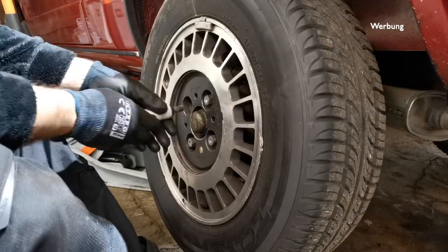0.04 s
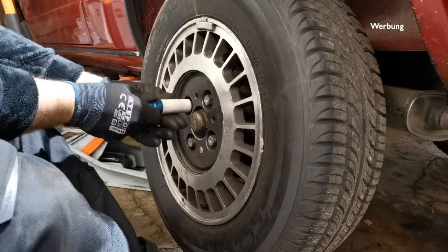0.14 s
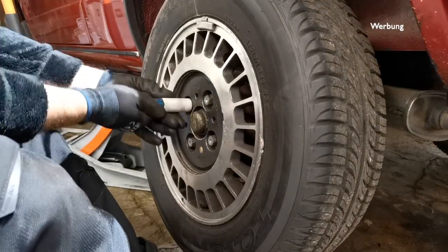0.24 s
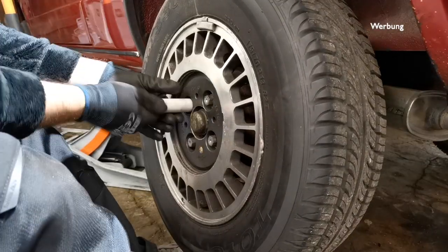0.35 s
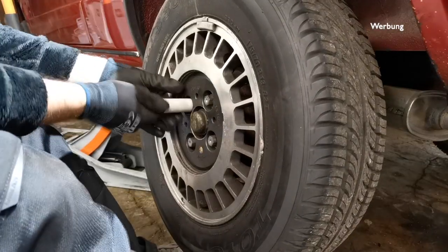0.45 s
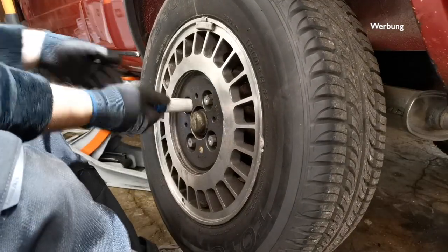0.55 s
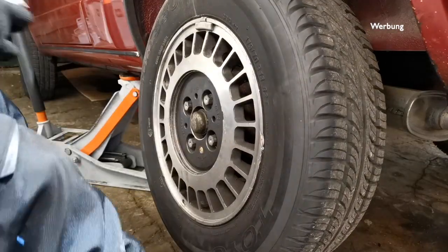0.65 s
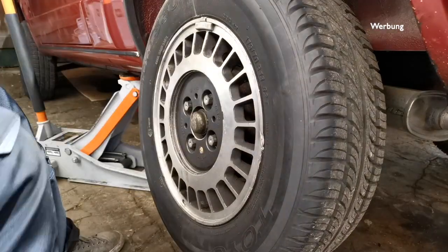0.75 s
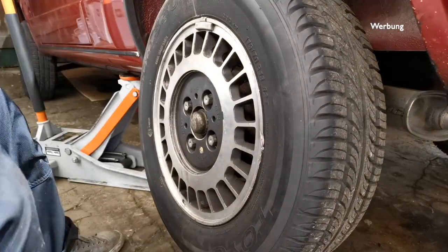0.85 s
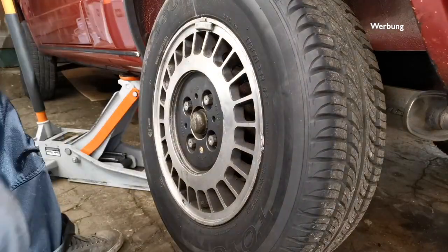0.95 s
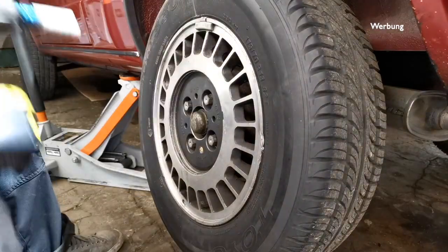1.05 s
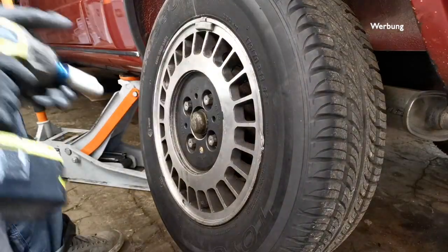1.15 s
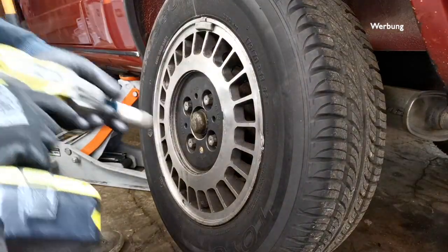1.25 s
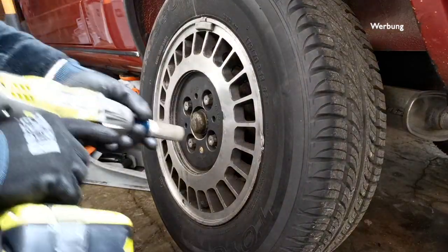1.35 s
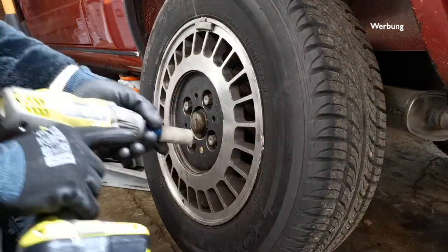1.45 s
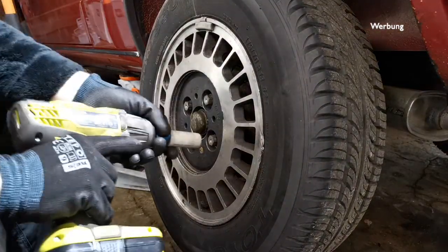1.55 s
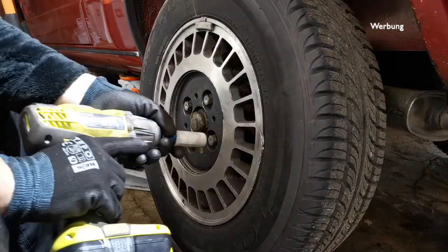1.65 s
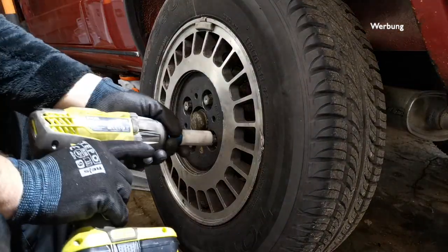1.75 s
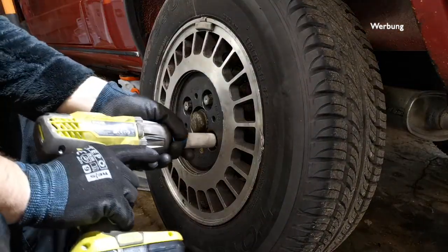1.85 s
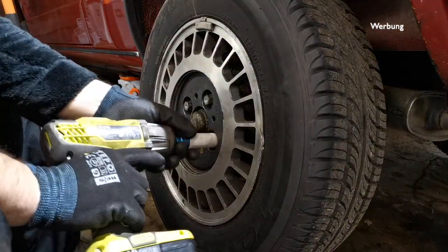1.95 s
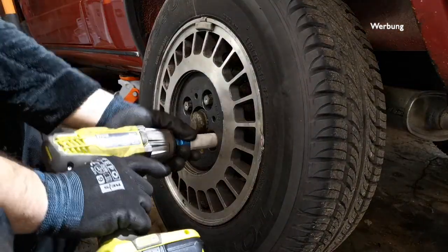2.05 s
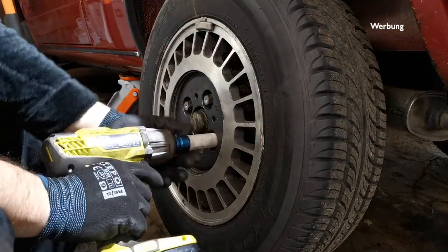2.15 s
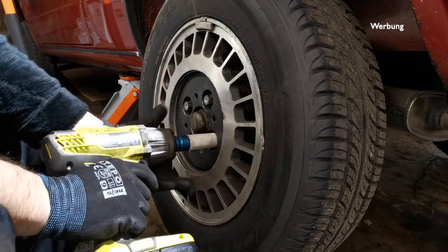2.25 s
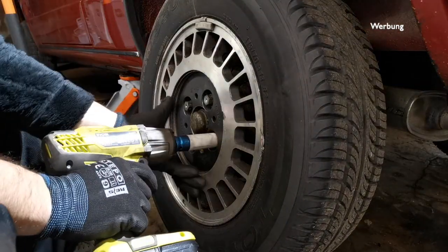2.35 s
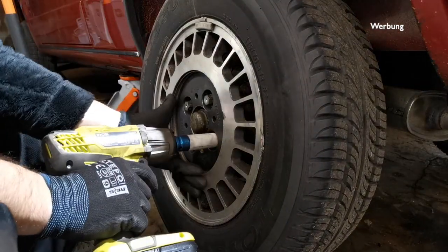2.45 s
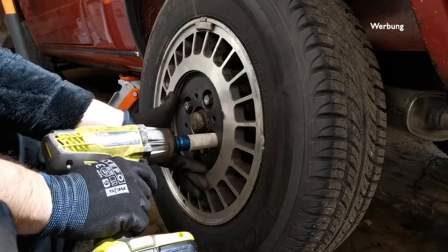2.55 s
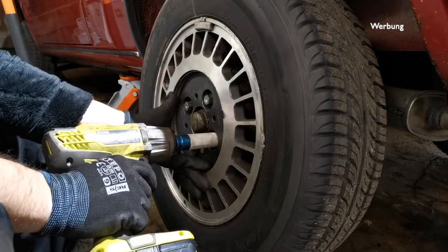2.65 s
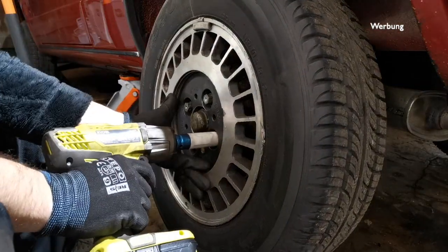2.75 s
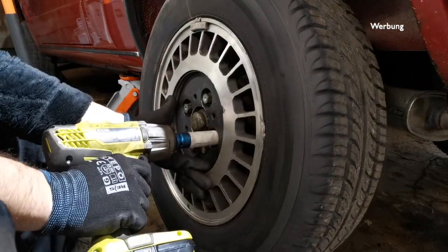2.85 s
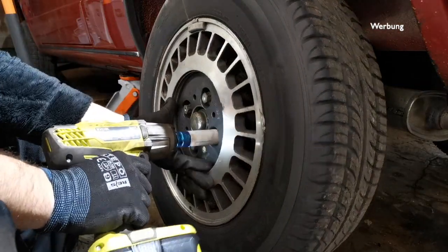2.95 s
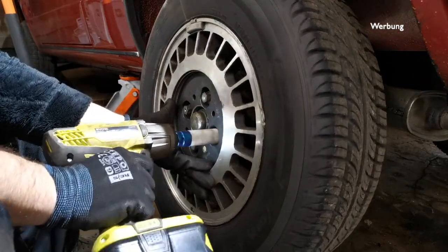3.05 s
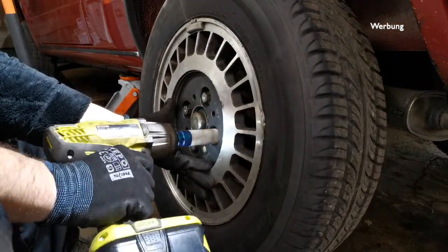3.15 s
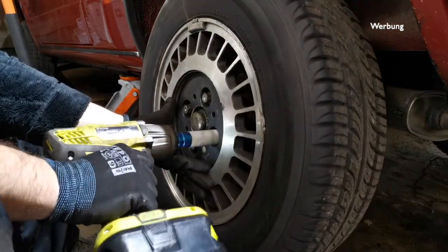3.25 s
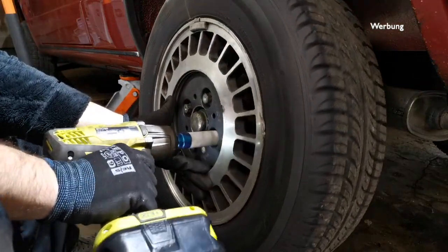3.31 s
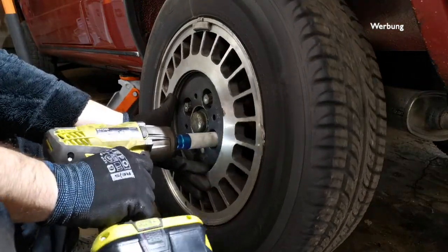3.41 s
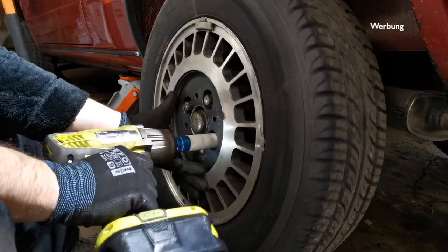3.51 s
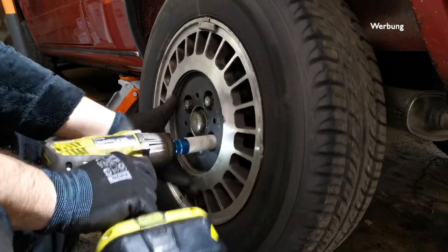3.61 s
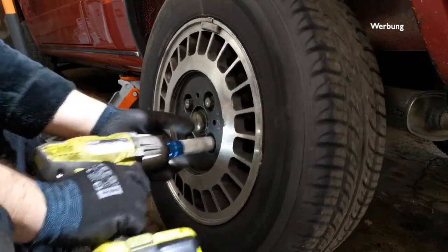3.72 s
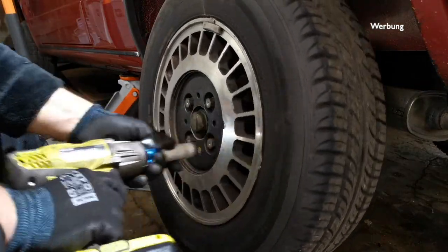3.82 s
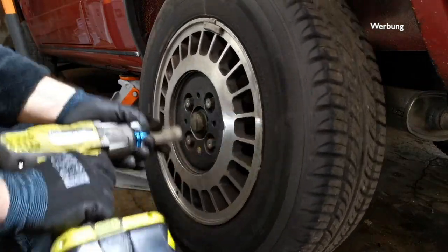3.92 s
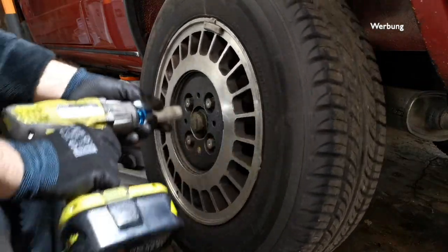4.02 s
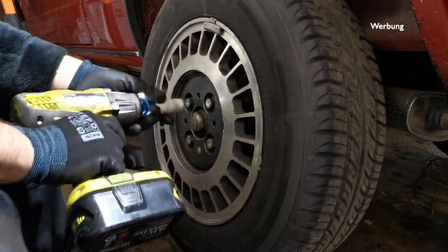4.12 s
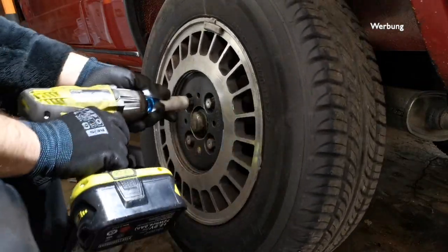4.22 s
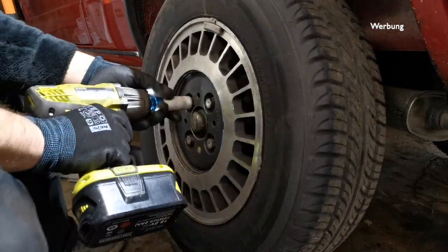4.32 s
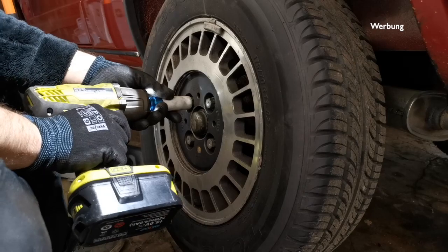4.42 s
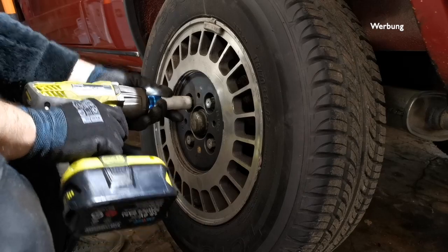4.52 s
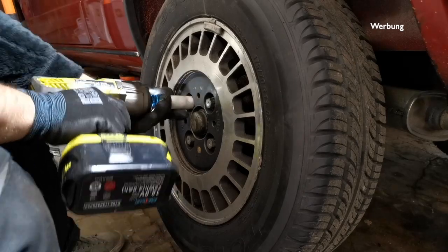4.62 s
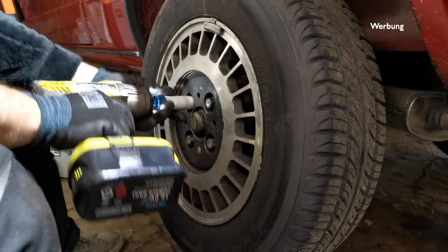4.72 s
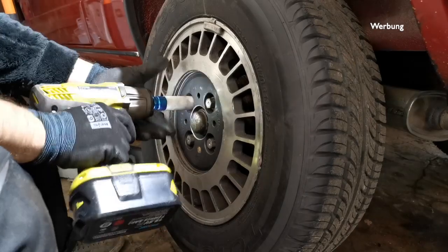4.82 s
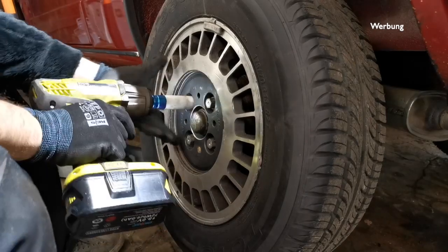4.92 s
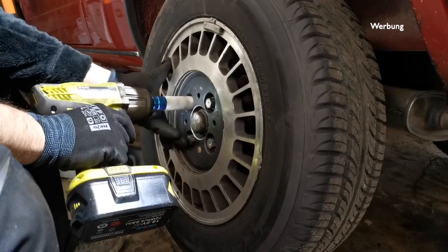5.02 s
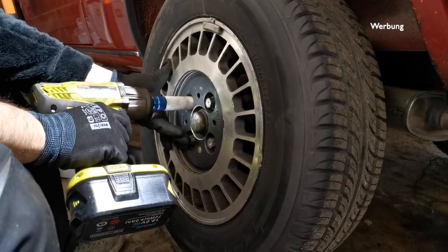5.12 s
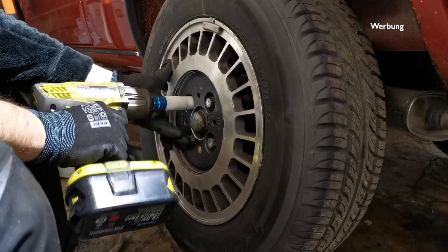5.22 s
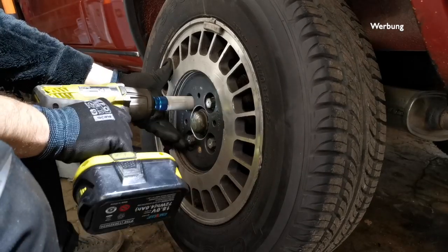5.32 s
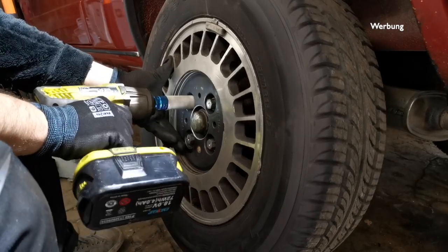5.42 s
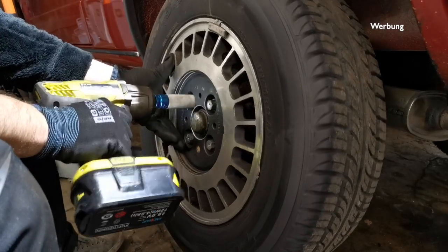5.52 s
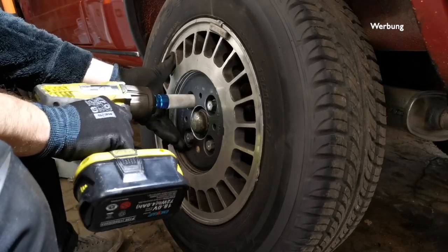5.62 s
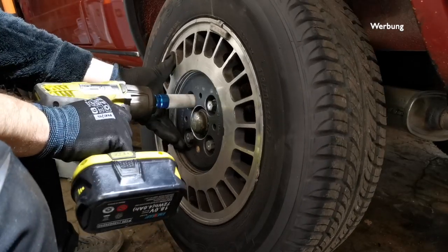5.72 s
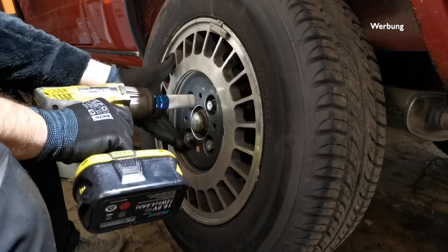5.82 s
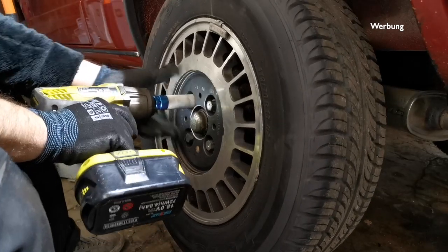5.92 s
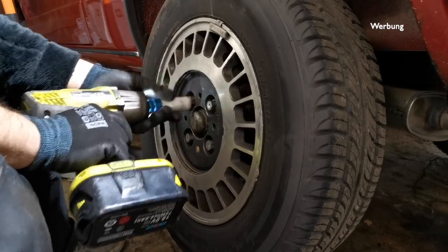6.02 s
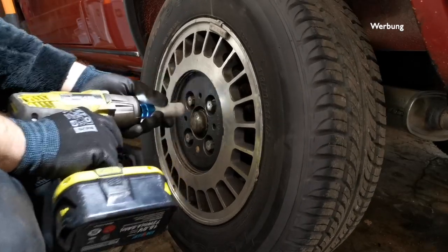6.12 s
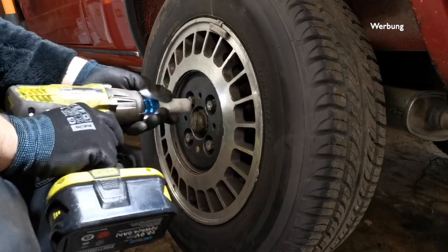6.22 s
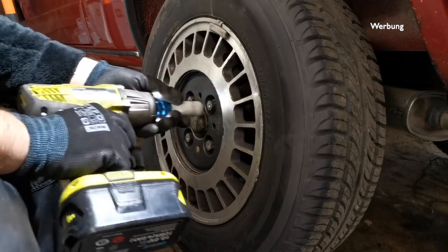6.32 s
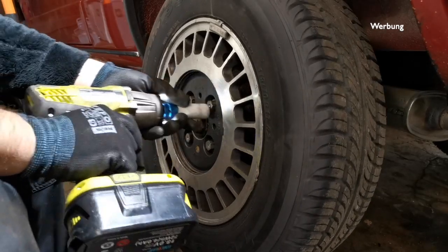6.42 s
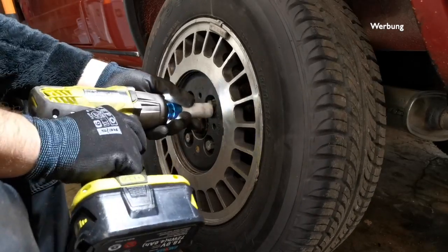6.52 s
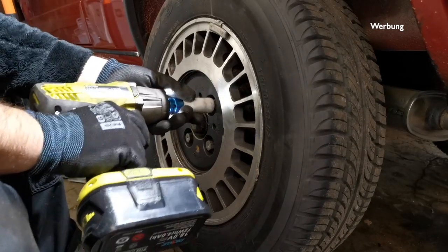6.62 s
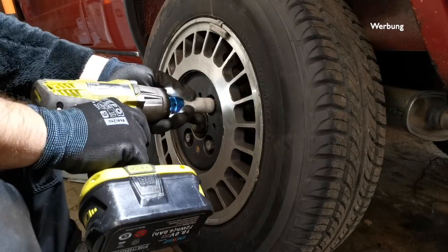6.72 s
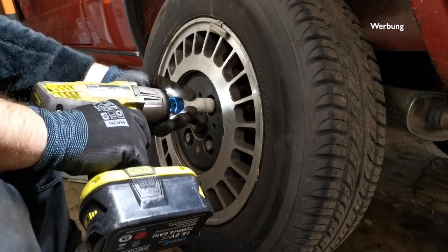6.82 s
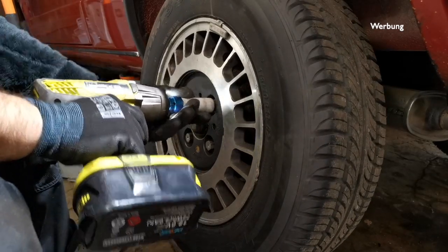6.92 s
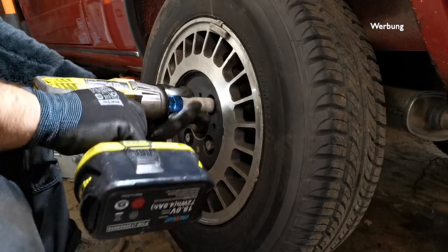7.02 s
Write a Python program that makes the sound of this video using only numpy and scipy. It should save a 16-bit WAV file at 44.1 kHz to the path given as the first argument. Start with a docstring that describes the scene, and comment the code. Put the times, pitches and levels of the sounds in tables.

```python
"""Impact wrench in a garage

A bolt is started by hand; then a cordless wrench tightens two wheel bolts. Its motor spins up, and
the hammer strikes the anvil about 41 times a second, stumbling between runs. Each impact excites
bolt, wheel and socket, reverberates between hard walls and overloads the microphone."""
import sys
import numpy as np
from scipy import signal
from scipy.fft import rfft, irfft
from scipy.io import wavfile
from scipy.ndimage import map_coordinates

SR = 44100
rng = np.random.default_rng(int(sys.argv[2]) if len(sys.argv) > 2 else 0)


def int16_out(signal):
    """Quantize to a 16-bit WAV file."""
    q = np.round(np.clip(np.atleast_2d(signal).T, -1, 1) * 32767)
    wavfile.write(sys.argv[1], SR, q.astype(np.int16))


N = 311346

# Levels are relative; spectra give level per unit bandwidth; t60 is the time to decay by 60 dB.
# reverberation time of the garage: f/Hz, t60/s
ROOM_T60 = [(100, 0.92), (400, 0.4768), (1000, 0.5943), (2800, 0.5531), (5500, 0.5462), (8000, 0.45),
            (11000, 0.36), (15000, 0.26)]
# initial spectrum of the reverberation: f/Hz, level/dB
ROOM_SPECTRUM = [(100, -6.5), (500, 4.5), (2000, -0.5), (6000, -0.5), (9000, -2), (15000, -2)]
# faint opening hiss: f/Hz, level/dB
HISS_SPECTRUM = [(40, -15), (100, -14.5), (160, -6), (230, -8.5), (330, 0.5), (390, -8), (470, 1),
                 (620, -10.5), (950, -4), (1400, -14.5), (3500, -17), (7000, -7), (13000, -7), (15500, -10)]
# hum and air of the workshop: f/Hz, level/dB
SHOP_SPECTRUM = [(15, -25), (25, 3), (82, -7.5), (113, 2.5), (152, -7), (340, -7.5), (410, -5), (457, -6.5),
                 (1620, -6.5), (8810, -24), (10600, -27.5), (12800, -22.5), (15500, -29)]
# rubbing cloth: f/Hz, level/dB
CLOTH_SPECTRUM = [(120, -37), (200, -4), (321, -4.5), (479, -8.5), (1110, -1), (4580, -5.5), (6590, -7),
                  (15500, -17.5)]
# sleeves and gloves brushing as the arms move: start t/s, end t/s, level/dB
ARM_MOVES = [(0, 1.0, -77.5), (1.01, 1.45, -65), (2.197, 2.598, -69), (4.5, 4.85, -72)]
# fingers and bolt clicking in its hole: t/s, level/dB, centre f/Hz, width/octaves
BOLT_TICKS = [(.047, -63, 12100, .2), (.148, -61, 13000, .5), (.646, -59, 2300, 1.1), (.657, -58, 9000, 1),
              (.708, -53, 3420, 1.2), (.793, -64, 2500, 1), (.826, -52, 12400, .7), (.9, -54.5, 4240, 1.2),
              (.9325, -44, 5260, 2.2), (1.063, -51, 6500, .6), (1.135, -52, 6500, .7)]
# socket and tool knocking on wheel and bolt heads: t/s, level/dB, centre f/Hz, width/octaves
TOOL_KNOCKS = [(1.526, -37, 3570, 2.2), (1.856, -44, 1580, 1.2), (1.96, -50.5, 700, 2.2),
               (2.481, -52, 4000, 3.6), (2.885, -53, 6030, .95), (4.297, -42, 1480, .9),
               (4.313, -39.5, 2800, 2.2), (4.321, -35.5, 930, 1.27), (4.507, -57, 8100, .5),
               (4.58, -56, 709, 1.5), (4.765, -56, 4000, 2.6), (4.795, -51.5, 8000, .8),
               (4.95, -53, 550, 1.06), (5.174, -50.5, 5990, .95), (6.465, -61.5, 400, 0.52),
               (6.627, -48.5, 1290, .8), (6.6505, -45, 1290, 0.86)]
# resonances of the wheel and the loose socket: f/Hz, bandwidth/Hz, level/dB
WHEEL_RESONANCES = [(480, 160, 1.5), (1016, 250, 4.5), (1350, 200, 3.5), (1760, 200, 1), (2530, 370, 4),
                    (2870, 300, 3), (3560, 300, 4.5), (5900, 280, 0)]
# weak treble of a light touch: f/Hz, level/dB
TOUCH_ROLLOFF = [(8500, -3), (10500, -12), (14000, -6.5)]
# gear noise: f/Hz, level/dB
GEAR_SPECTRUM = [(59, -61), (100, -23), (386, -28), (727, -13), (1260, -11), (1960, -14.5), (2220, -0.5),
                 (2690, 2.5), (3460, -4.5), (4100, -11.5), (8580, -15), (10800, -26.5), (13100, -17),
                 (15500, -29)]
# gear whine: harmonic number, level/dB
MESH_HARMONICS = [(1, -16), (2, -6), (3, -2), (4, -18)]
# trigger pulls, one per bolt: pressed t/s, bolt seated t/s, released t/s, spin-up time constant/s,
# gear noise level/dB, rise under load/dB
TRIGGER_PULLS = [(2.941, 3.029, 3.63, .024, 4, 2), (5.232, 5.322, 5.89, .012, 1.5, 6.5)]
# radiation of the first bolt and the wheel: f/Hz, level/dB
FIRST_BOLT_SPECTRUM = [(18, -50), (30, -19), (77, -25.5), (111, -21), (324, -24), (532, -17.5),
                       (591, -21.5), (709, -16), (1200, -13.5), (2300, -6.5), (4420, -5.5), (6210, -1.5),
                       (8280, -1.5), (9680, -11.5), (15500, -16)]
# radiation of the second bolt and the wheel: f/Hz, level/dB
SECOND_BOLT_SPECTRUM = [(18, -49), (30, -19), (192, -18.5), (237, -17.5), (350, -24), (479, -12.5),
                        (606, -17.5), (673, -13.5), (1720, -5.5), (2690, -0.5), (5170, -1), (7080, -2),
                        (8500, 0.5), (10200, -9.5), (15500, -10.5)]
# modes of socket and anvil: f/Hz, level on the first bolt/dB, level on the second/dB, t60/s
SOCKET_MODES = [(2770, -17.5, -18, 0.065), (3750, -21, -18, 0.0088), (4900, -20.5, -2.5, 0.022),
                (5247, -3, -3, 0.038), (5550, -6.5, -12, 0.075), (5790, -10, -10.5, 0.086),
                (6374, -2.5, -9, 0.057), (7280, -7, -12.5, .025), (8120, -11, -18.5, .02),
                (8430, -8.5, -6, 0.04), (8840, -18.5, -10, 0.024)]
# steady hammering: first blow t/s, number of blows, rate/Hz, lag of the second blow/s, level/dB,
# first ring level/dB, last ring level/dB
HAMMER_RUNS = [(3.2374, 6, 43, 0.0041, 0.9, 4, 1.5), (3.4845, 6, 41.3, 0.0041, 2.5, 0, 4.5),
               (5.3312, 7, 41.67, .0003, -.5, -6, 2), (5.5989, 11, 40.8, 0.0044, -0.1, -7.5, 4.5)]
# single blows as the hammer catches, stumbles or runs out: t/s, level/dB, ring level/dB
SINGLE_BLOWS = [(2.976, -20, -7), (3.0315, -13, -10), (3.0392, -1.5, -6.5), (3.0782, -2, -5),
                (3.1348, -4, -2.5), (3.152, -5.5, -4), (3.4474, -2.5, 1.5), (3.4584, -3, -1),
                (5.3245, -14.5, -5), (5.5023, -3.5, -5.5), (5.8785, -4, 9)]


def amp(db):
    """Amplitude ratio of a level in decibels."""
    return 10 ** (np.asarray(db) / 20)


def along(points, hz):
    """Interpolation of (f/Hz, value) points on a logarithmic frequency axis."""
    f, values = np.transpose(points)
    return np.interp(np.log(hz + 1), np.log(f + 1), values)


def wobble(rate):
    """Random modulation: a spline through `rate` Gaussian values a second."""
    return map_coordinates(rng.standard_normal(N // 50), [np.arange(N) * rate / SR], mode="wrap")


def noise(spectrum, size):
    """Spectral shaping: white noise filtered by (f/Hz, level/dB) points and scaled to rms 1."""
    gain = amp(along(spectrum, np.fft.rfftfreq(size, 1 / SR)))
    shaped = irfft(rfft(rng.standard_normal(size)) * gain, size)
    return shaped / np.sqrt(np.mean(shaped ** 2) + 1e-20)


def gate(on, off, rise_s, fall_s):
    """First-order response: exponential rise from time `on`, exponential decay from time `off`."""
    t = np.arange(N) / SR
    return (1 - np.exp(-np.maximum(t - on, 0) / rise_s)) * np.exp(-np.maximum(t - off, 0) / fall_s)


def add(track, s, sound):
    """Superposition of a sound on a track at s seconds."""
    start = max(round(s * SR), 0)
    track[start:start + len(sound)] += sound[:len(track) - start]


def diffuse_tail(spectrum, build_s=0.0035):
    """Reverberation of unit energy: the diffuse field builds up, then decays, the treble fastest."""
    hz, t, bins = signal.stft(noise(spectrum, SR * 3 // 4), SR, nperseg=256)
    decay = amp(along(ROOM_SPECTRUM, hz)[:, None] - 60 * t / along(ROOM_T60, hz)[:, None])
    tail = signal.istft(bins * decay * (1 - np.exp(-t / build_s)), SR, nperseg=256)[1]
    return tail / np.linalg.norm(tail)


def in_room(x, wet_db):
    """Convolution with the garage's impulse response adds reverberation to the direct sound."""
    return x + amp(wet_db) * signal.fftconvolve(x, diffuse_tail([(1, 0)]))[:N]


def early_reflections(x, count=5, gain=.07):
    """Comb filtering: wheel arch, floor and car body return weak delayed copies."""
    out = x.copy()
    for delay_s in rng.uniform(.002, .018, count):
        add(out, delay_s, gain * x)
    return out


def burst(spectrum, envelope, wet_db):
    """A noise transient and its diffuse field; wet_db is the reverberant-to-direct energy ratio."""
    direct = noise(spectrum, len(envelope)) * envelope
    sound = amp(wet_db) * np.linalg.norm(direct) * diffuse_tail(spectrum)
    sound[:len(direct)] += direct
    return sound


def workshop(hiss_db=-71.5, shop_db=-66.5):
    """Ambient noise: faint hiss gives way to the workshop's hum and air after a second."""
    shop_share = np.interp(np.arange(N) / SR, [1.015, 1.035], [0.13, 0.91])
    shop = amp(shop_db + 0.54 * wobble(1.8)) * noise(SHOP_SPECTRUM, N)
    hiss = amp(hiss_db) * noise(HISS_SPECTRUM, N)
    return (1 - shop_share) * hiss + shop_share * shop


def clothes(still_db=-81):
    """Friction noise: sleeves and gloves rustle with each move of the arms, and faintly between."""
    moves = [amp(db) * gate(start, end, rise_s=0.015, fall_s=0.19) for start, end, db in ARM_MOVES]
    envelope = np.maximum(np.max(moves, axis=0), amp(still_db))
    return envelope * amp(1.5 * wobble(29)) * noise(CLOTH_SPECTRUM, N)


def contacts(rows, wet_db, body_db, t60):
    """Impact excitation: each light touch is a decaying noise band, coloured by the body touched."""
    out, t = np.zeros(N), np.arange(SR // 4) / SR
    hz = np.geomspace(30, SR / 2, 400)
    for s, db, centre_hz, octaves in rows:
        band_db = body_db(hz) - 28 * np.log10(1 + (np.log2(hz / centre_hz) / octaves) ** 2)
        envelope = amp(db - 60 * t / t60(centre_hz)) * (1 - np.exp(-t / 0.00032)) / 2
        add(out, s, burst(np.c_[hz, band_db], envelope, wet_db))
    return out


def bolt_ticks():
    """Small impacts: the bolt, turned by hand, clicks in its hole with a fixed decay time."""
    return contacts(BOLT_TICKS, wet_db=-20, body_db=np.zeros_like, t60=lambda hz: 0.077)


def wheel_response(hz):
    """Resonance: the wheel's response in dB, Lorentzian peaks on the roll-off of a light touch."""
    peaks = sum(db / (1 + (2 * (hz - centre) / width) ** 2) for centre, width, db in WHEEL_RESONANCES)
    return along(TOUCH_ROLLOFF, hz) + peaks


def tool_knocks():
    """Damped vibration: the tool knocks on the wheel, and the higher knocks die sooner."""
    return contacts(TOOL_KNOCKS, wet_db=2, body_db=wheel_response,
                    t60=lambda hz: .12 * (hz / 1000) ** -.45)


def tyre_cavity(hz=253, t60=1.7):
    """Cavity resonance: the ring of air in the tyre hums on after each bolt's last blow."""
    out, t = np.zeros(N), np.arange(2 * SR) / SR
    hum = amp(-60 * t / t60) * np.sin(2 * np.pi * hz * t) * (1 - np.exp(-t / .02))
    for s, db in [(3.6, -55.5), (5.88, -51.5)]:
        add(out, s, amp(db) * hum)
    return out


def drive(sag=.2, grip_s=.012, coast_s=0.064):
    """Inertia and load: the motor spins up, slows as the bolt seats, and coasts to rest."""
    speed, load_db = np.zeros(N), np.zeros(N)  # speed 1 is free running
    for pressed, seated, released, spin_up_s, free_db, strain_db in TRIGGER_PULLS:
        running = gate(pressed, released, spin_up_s, coast_s)
        strain = gate(seated, released, grip_s, coast_s)
        speed += running * (1 - sag * strain)
        load_db += free_db * running + strain_db * strain
    return speed, load_db


def motor(mesh_hz=1135, db=-34, whine_db=4):
    """Gear meshing: noise grows with speed and load; a harmonic whine emerges near full speed."""
    speed, load_db = drive()
    phase = 2 * np.pi * np.cumsum(mesh_hz * speed * (1 + .005 * wobble(250))) / SR
    harmonics = sum(amp(level) * np.sin(k * phase) for k, level in MESH_HARMONICS)
    whine = amp(whine_db) * speed ** 4 * harmonics
    grind = noise(GEAR_SPECTRUM, N) * (1 + .4 * np.sin(phase / 3))  # swells once per rotor turn
    return in_room(amp(db) * speed ** 2 * (amp(load_db) * grind + whine), wet_db=-5)


def blows(lag_kept=.4, first_blow_db=-1, scatter_db=0.9):
    """Impulse train (t/s, level/dB, ring level/dB): each run settles to its rate as the motor picks up."""
    rows = list(SINGLE_BLOWS)
    for start, count, rate, lag_s, db, ring_from, ring_to in HAMMER_RUNS:
        k = np.arange(round(count))
        times = start + k / rate + lag_s * (1 - lag_kept ** k) / (1 - lag_kept)
        level_db = db + first_blow_db * (k == 0) + scatter_db * rng.standard_normal(len(k))
        ring_db = np.linspace(ring_from, ring_to, len(k))  # changes as the bolt beds in
        rows += zip(times, level_db, ring_db)
    return rows


def socket_ring(t, on_first_bolt, detune=.008, scatter_db=2.5):
    """Modal vibration: damped sinusoids that vary as the socket sits differently at every blow."""
    hz, first_db, second_db, t60 = np.transpose(SOCKET_MODES)[:, :, None]
    mode_db = first_db if on_first_bolt else second_db
    strength, shift, phase = rng.standard_normal((3, len(SOCKET_MODES), 1))
    modes = np.sin(2 * np.pi * (hz * (1 + detune * shift) * t + phase))
    decays = amp(mode_db + scatter_db * strength - 60 * t / t60)
    return (decays * modes).sum(0) * (1 - np.exp(-t / .0004))


def hammer(crack_t60=0.011, bounce_s=0.0061, rim_t60=0.11, socket_db=-4, gain_db=-2.5):
    """Impulsive excitation: each blow on the anvil cracks through bolt and wheel and rings the socket."""
    cracks, rings, t = np.zeros(N), np.zeros(N), np.arange(SR // 10) / SR
    bounce = 0.5 * np.exp(-((t - bounce_s) / 0.0022) ** 2)  # reflection off wheel and floor
    rim = 0.18 * amp(-60 * t / rim_t60)
    envelope = (amp(-60 * t / crack_t60) + bounce + rim) * (1 - np.exp(-t / 0.000049))
    for s, db, ring_db in blows():
        on_first_bolt = s < TRIGGER_PULLS[1][0]
        spectrum = FIRST_BOLT_SPECTRUM if on_first_bolt else SECOND_BOLT_SPECTRUM
        add(rings, s, amp(db + socket_db + ring_db) * socket_ring(t, on_first_bolt))
        add(cracks, s, amp(db) * burst(spectrum, envelope, wet_db=1.69))
    return amp(gain_db) * early_reflections(cracks + in_room(rings, wet_db=-13))


def scene():
    """Superposition: handling, wrench, tyre and background add in one channel."""
    handling = bolt_ticks() + tool_knocks()
    return (handling + hammer() + tyre_cavity() + motor() + clothes() + workshop())[None]


def record(dry, ceiling=1.02, cutoff_hz=15800):
    """Saturation and band limiting: the blows clip near full scale, and the treble ends steeply."""
    clipped = dry / (1 + np.abs(dry / ceiling) ** 8) ** (1 / 8)
    low_pass = signal.firwin(301, cutoff_hz, fs=SR, window="blackman")
    return signal.fftconvolve(clipped, low_pass[None], mode="same")


dry = scene()
out = record(dry)
int16_out(out)
```